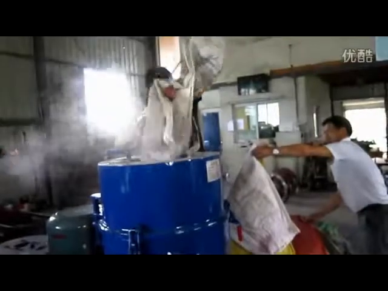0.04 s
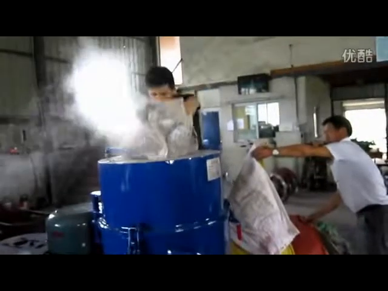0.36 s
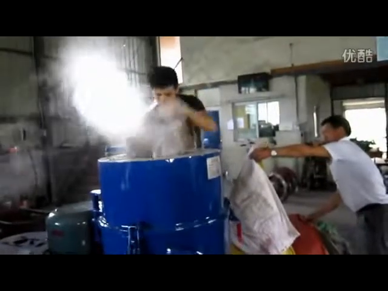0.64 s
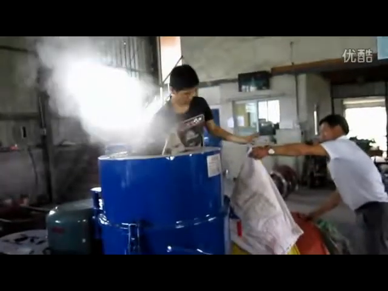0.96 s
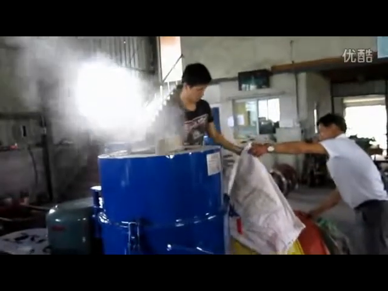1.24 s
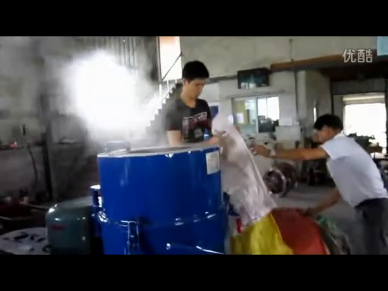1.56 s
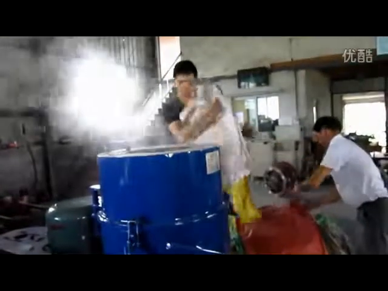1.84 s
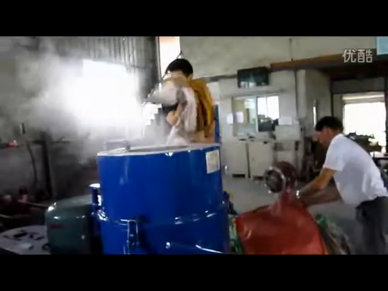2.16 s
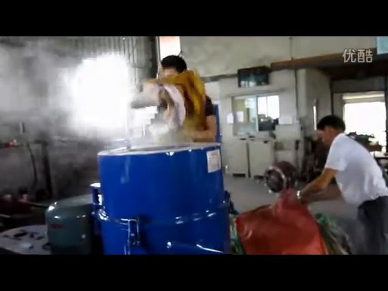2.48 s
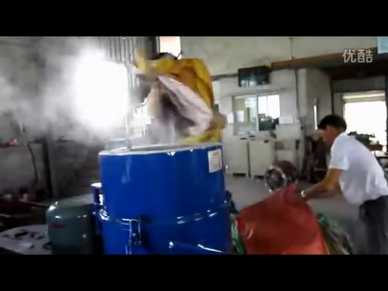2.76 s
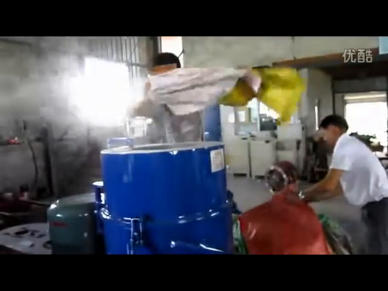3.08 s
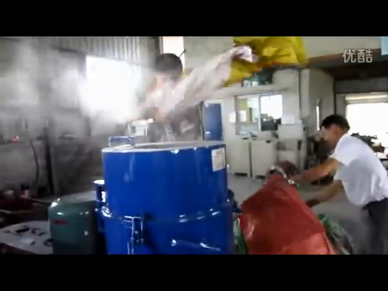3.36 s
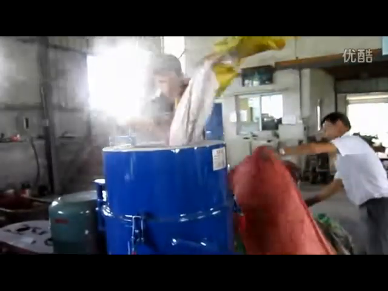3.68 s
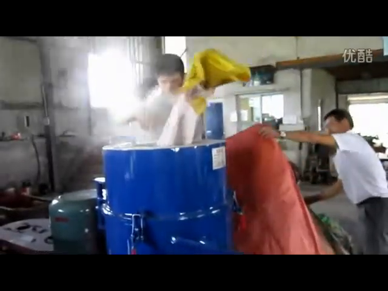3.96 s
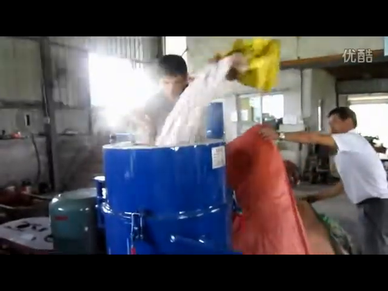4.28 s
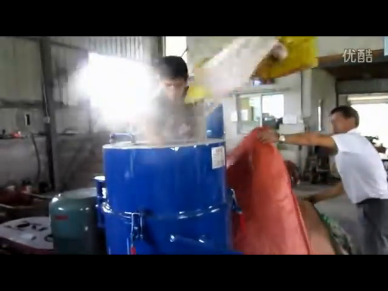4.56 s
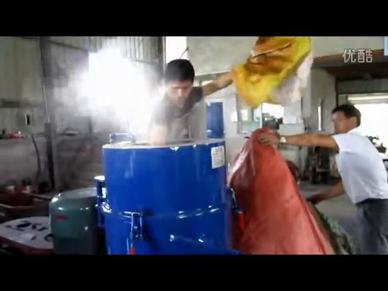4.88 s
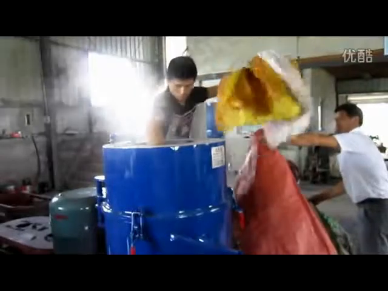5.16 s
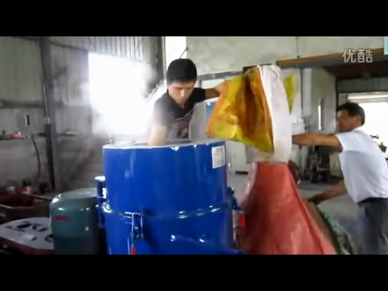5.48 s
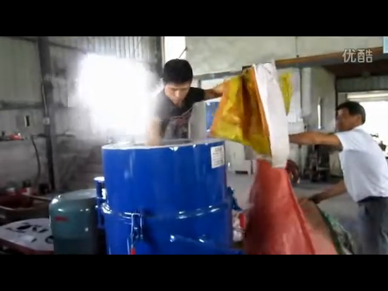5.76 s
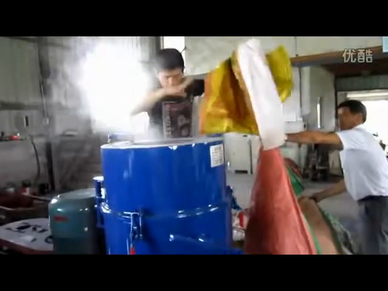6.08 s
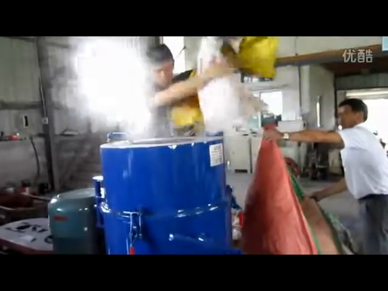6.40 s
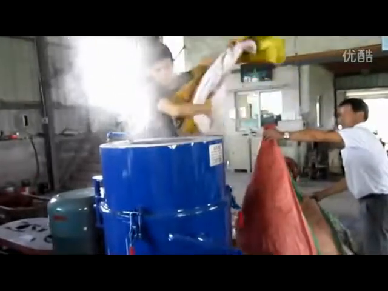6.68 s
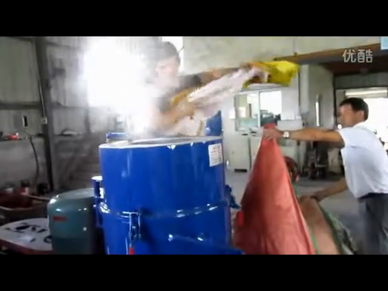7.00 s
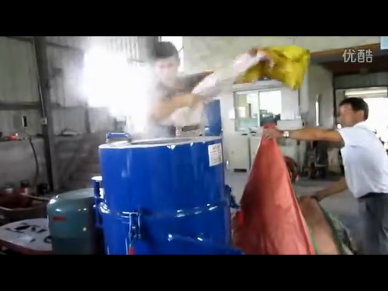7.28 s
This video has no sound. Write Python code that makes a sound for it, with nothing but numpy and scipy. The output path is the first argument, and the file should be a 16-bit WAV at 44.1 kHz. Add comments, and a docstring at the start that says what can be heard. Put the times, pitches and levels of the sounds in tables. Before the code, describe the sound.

Shredded plastic rushes and scrapes around a machine's drum in a workshop, over a droning motor, wavering blade howl and faint thin squeals.

```python
"""A hard-walled workshop, one microphone near a plastic recycling machine churning film in a steel drum.
Shreds tumble, rush, scrape and hiss; the rush surges when the blades catch a wad.
The blades howl in waves as the heap circles and slumps. Motor and rotor drone on many multiples
of the shaft speed, sagging a little under load. Behind it all, plastic squeals thinly on the steel."""
import sys
import numpy as np
from scipy import signal
from scipy.fft import rfft, irfft, next_fast_len
from scipy.io import wavfile
from scipy.ndimage import uniform_filter1d

SR = 44100
rng = np.random.default_rng(int(sys.argv[2]) if len(sys.argv) > 2 else 0)


def output_pcm(signal):
    """Save a mono or channel-first signal as 16-bit PCM at the path in sys.argv[1].

    Samples are clipped to [-1, 1] before scaling.
    """
    pcm = np.clip(np.atleast_2d(signal).T, -1, 1) * 32767
    wavfile.write(sys.argv[1], SR, np.round(pcm).astype(np.int16))


N = 328104
TIME = np.arange(N) / SR

# the heap's five noises as they reach the microphone, low to high: f/Hz, relative level/dB
TUMBLE_SPECTRUM = [(20, -35), (50, -20.5), (90, -20.5), (112, -8.5), (135, -15.5), (170, 0), (215, 0),
                   (250, 0), (268, -10.5), (310, 2), (400, -0.5), (520, -7.5), (1000, -32.5)]
THUD_SPECTRUM = [(200, -32.5), (380, -9.5), (470, -5.5), (525, 0), (565, -4.5), (640, -21.5), (800, -40.5)]
RUSH_SPECTRUM = [(450, -34.5), (600, -6), (680, -5), (725, -7), (890, -1.5), (1200, -2.5), (1400, -4.5),
                 (1540, -3.5), (1640, -12), (2500, -41.5)]
SCRAPE_SPECTRUM = [(900, -34.5), (1600, -3), (2050, 1), (2450, -2.5), (2850, -4.5), (3300, -11.5),
                   (4500, -24), (7000, -49)]
HISS_SPECTRUM = [(1800, -28.5), (3000, 1.5), (3600, 3.5), (4700, 1.5), (5350, 1), (5750, -2), (6000, -4.5),
                 (6300, -8), (6800, -11.5), (7300, -29.5)]
# the low tumbling of lumps: t/s, level/dB
TUMBLE_LEVEL = [(0, -35), (.25, -37), (.8, -34.5), (1.02, -32), (1.2, -34.5), (1.37, -36.5), (1.52, -30),
                (1.67, -34), (1.8, -30.5), (2.1, -31.5), (2.4, -35.5), (2.48, -35), (2.63, -28),
                (2.78, -33.5), (3.05, -33.5), (3.32, -38), (3.48, -32.5), (3.66, -38), (3.87, -36),
                (4.05, -32.5), (4.17, -35), (4.28, -35.5), (4.45, -34.5), (4.87, -36.5), (5.25, -31),
                (5.6, -32), (6.08, -34.5), (6.28, -32), (6.55, -33.5), (6.78, -39), (6.95, -34.5),
                (7.2, -37), (7.44, -37.5)]
# the heap slumps against the drum wall (+) or lifts off it (-): peak t/s, length/s, change/dB
HEAP_SLUMPS = [(.72, 0.24, -2), (1.3, 0.26, 2), (1.47, 0.22, 4.5), (2.15, 0.4, 1.5), (2.47, .14, -1.5),
               (1.8, 0.33, 1.5), (2.85, 0.26, 2.5), (3.48, .16, 3.5), (3.68, .22, -2.5), (3.95, .24, -3),
               (4.28, .12, -3.5), (4.42, .22, 3), (5.03, .35, 0), (5.9, .14, -2), (6.27, 0.38, 2.5),
               (6.58, .14, 0.5), (6.83, .2, -1.8), (7.2, 0.25, 2.4)]
# fine flakes shower down the drum wall (+) or thin out (-): peak t/s, length/s, change/dB
FLAKE_SHOWERS = [(.08, 0.29, 0.5), (1.78, .3, -1), (2.55, .22, 1), (2.86, 0.26, -0.5), (4.5, 0.53, 1),
                 (4.95, .25, -0.5), (5.83, 0.19, -0.5), (6.35, 0.25, 1.3), (6.88, .3, -1)]

def churn(turns, thud_db=-32, rush_db=-23, scrape_db=-30.5, hiss_db=-37, waver_db=0.5):
    """Up front, lumps tumble and thud, the mass rushes round, flakes scrape and hiss along the drum."""
    sag, rush_surge, scrape_surge = strain()
    tumble = curves(TUMBLE_LEVEL)[0]
    thud = thud_db + swells(HEAP_SLUMPS)
    rush = rush_db + rush_surge + waver_db * waver(30)
    # load turns hiss into scraping
    scrape = scrape_db + 8 * sag + scrape_surge + waver_db * waver(42)
    hiss = hiss_db - 6 * sag + swells(FLAKE_SHOWERS) + waver_db * waver(24)
    lumps = shreds(turns, per_s=4000, spread_db=0.3, throb=0.082)
    flakes = shreds(turns, per_s=5000, spread_db=2.5, throb=0.024)
    layers = [(tumble, rng.standard_normal(N), TUMBLE_SPECTRUM),
              (thud, rng.standard_normal(N), THUD_SPECTRUM),
              (rush, lumps, RUSH_SPECTRUM),
              (scrape, flakes, SCRAPE_SPECTRUM),
              (hiss, rng.standard_normal(N), HISS_SPECTRUM)]
    return sum(gain_of(db) * steadied(coloured(workshop(drive), spectrum))
               for db, drive, spectrum in layers)


def shreds(turns, per_s, spread_db, throb):
    """Dense impacts of uneven size over rushing air, bunched twice a turn by the blades."""
    hits = (rng.random(N) < per_s / SR) * rng.standard_normal(N)
    hits *= gain_of(spread_db * np.minimum(rng.exponential(1, N), 4))
    air = rng.standard_normal(N)
    return (evened(hits) + air) * (1 + throb * np.cos(4 * np.pi * turns))


# the shaft, slowed by its load: t/s, speed/(turns per s)
SHAFT_SPEED = [(0, 25.82), (0.5, 25.764), (1, 25.752), (1.35, 25.76), (1.7, 25.684), (2, 25.692),
               (2.3, 25.776), (2.7, 25.752), (3.2, 25.804), (3.8, 25.832), (4.3, 25.82), (5, 25.84),
               (5.9, 25.856), (6.25, 25.752), (6.55, 25.76), (6.9, 25.816), (7.44, 25.812)]
# the blades catch a wad of film: peak t/s, length/s, rush change/dB, scrape change/dB
WAD_CATCHES = [(.36, 0.22, 1.3, 0), (1.06, .14, -3, 2.5), (1.32, .2, 0.5, -0.3), (1.93, 0.091, 2.5, 2),
               (2.2, 0.44, 0, 1.2), (2.39, .18, 0.5, 0.5), (2.65, 0.24, 1, 2.5), (2.97, .28, 0, 0),
               (3.3, 0.13, 2.5, 2), (3.97, 0.14, 0, 1), (4.14, 0.24, 0, 1), (4.42, .14, -1, 1.5),
               (4.88, 0.21, -0.5, 2), (5.31, 0.12, 2, 0), (5.54, .16, 1.5, 2), (5.7, .22, 1.3, 0),
               (5.92, 0.22, 1, 0), (6.15, 0.22, 1, 0.5), (6.29, 0.14, 2.1, 0.5), (6.35, .14, -1, 1.5),
               (6.45, 0.11, 1, 2), (6.53, 0.33, -0.8, 1.5), (6.73, .14, 0.8, .5), (6.95, .13, 2.3, 1),
               (7.15, 0.15, 1.5, 2.5)]
# further swells and dips of rush and scrape, played like the wad catches: peak t/s, length/s, rush change/dB,
# scrape change/dB
MORE_SWELLS = [(.25, .4, 0, -2), (.69, 0.27, -1.5, 0), (.9, 0.32, 1, -1.5), (1.1, 0.3, 1, -1.5),
               (1.17, .12, -1.5, -0.5), (1.5, 0.13, -2.3, 1.5), (2.75, 0.18, -2.5, -2.5),
               (3.6, 0.12, -1, 1), (4.72, .18, -1, -0.5), (5.02, .14, -0.5, 0.5), (5.75, .16, -1.5, 0),
               (6.84, .13, -4, -1)]

def strain(free_turns_per_s=25.86):
    """How hard the drum works: the shaft's sag (turns per s) and the swells of rush and scrape (dB)."""
    sag = free_turns_per_s - curves(SHAFT_SPEED)[0]
    peaks, lengths, *changes = np.transpose([*WAD_CATCHES, *MORE_SWELLS])
    rush, scrape = (swells(zip(peaks, lengths, db)) for db in changes)
    return sag, rush, scrape


HUM_ORDER, WHINE_ORDER, HOWL_ORDER, UPPER_ORDER, TOP_ORDER = 6, 26, 30, 36, 39  # cycles per turn
# the lowest whine: t/s, level/dB
WHINE_LEVEL = [(0, -35), (.3, -31.5), (.43, -48), (.6, -38), (.97, -31), (1.13, -46), (1.26, -31.5),
               (1.5, -37), (1.62, -32), (2.03, -41), (2.2, -33), (2.6, -34), (2.73, -35.5), (2.86, -31.5),
               (4.45, -31), (5, -32.5), (5.17, -27.5), (5.35, -33), (6.6, -32.5), (6.76, -36), (7, -38),
               (7.44, -37)]
# waves of howling as the heap circles past: peak t/s, length/s, change/dB
HOWL_WAVES = [(.28, .25, -2), (.74, .25, 5), (.97, 0.37, 5), (1.36, 0.26, 6.5), (1.64, 0.45, 2),
              (1.97, 0.32, 4), (2.39, 0.3, 6), (2.68, .3, 1), (2.92, .3, 3), (3.15, 0.25, 5.5),
              (3.56, 0.21, 9.5), (3.82, 0.47, 5.5), (4.12, .4, 2.5), (4.55, 0.57, 5.5), (4.82, .25, 3.5),
              (5.05, .25, -1), (5.33, 0.17, 8.5), (5.56, 0.18, 8), (5.81, 0.19, 6), (6.04, .2, 2.5),
              (6.24, 0.4, 8), (6.43, 0.27, 7.5), (6.75, 0.21, 6.5), (6.98, .28, 7), (7.2, 0.3, 8),
              (7.36, 0.34, 5)]
# the upper whines, smothered by fresh film and rising as the blades clear: t/s, change/dB
BLADE_CLEARANCE = [(0, -4.5), (.6, -8), (1.35, 0.5), (1.9, -4), (2.25, 0.5), (3.2, 0.5), (4.05, 3),
                   (4.9, -0.5), (6.3, 0), (6.75, -0.5), (7.2, -3), (7.44, 1)]

def blades(turns, hum_db=-42.5, howl_db=-32, upper_db=-32.5, top_db=-37, waver_db=0.5):
    """The rotor's main tones: load lifts the hum, the howl comes in waves, clear blades whine more."""
    sag, surge, _ = strain()
    clearance = curves(BLADE_CLEARANCE)[0]
    hum = hum_db + 30 * sag + 0.3 * waver(10)
    whine = curves(WHINE_LEVEL)[0] + waver_db * waver(15)
    howl = howl_db + swells(HOWL_WAVES) + waver_db * waver(17)
    upper = upper_db + clearance + .5 * surge + waver_db * waver(5.7)
    return (gain_of(hum) * tone(HUM_ORDER * turns)
            + gain_of(whine) * tone(WHINE_ORDER * turns)
            + gain_of(howl) * blade_tone(HOWL_ORDER * turns, wake_db=-8, wake_ratio=.997, width_hz=35)
            + gain_of(upper) * blade_tone(UPPER_ORDER * turns, wake_db=-5, wake_ratio=.995, width_hz=22)
            + gain_of(top_db + clearance) * tone(TOP_ORDER * turns))


def blade_tone(cycles, wake_db, wake_ratio, width_hz):
    """A tone of the blades, blurred just below its pitch by the plastic that trails them."""
    return tone(cycles) + gain_of(wake_db) * steadied(fuzzy(wake_ratio * cycles, width_hz))


# weaker lines of motor and rotor: multiple of the shaft speed, level/dB
DRONE_LINES = [(10,-51), (12,-41), (13,-49), (14,-39), (17,-40), (18,-37), (19,-38), (20,-40), (21,-37),
               (22,-53.5), (23,-41.5), (24,-49), (25,-38), (27,-39.5), (31,-47.5), (32,-53), (33,-48),
               (34,-42.5), (35,-42), (38,-40.5), (40,-43.5), (41,-39.5), (43,-43), (44,-44.5), (45,-41),
               (46,-46), (47,-49.5), (48,-45.5), (49,-42.5), (51,-40), (58,-55), (60,-47)]

def drone(turns, unsteady=0.19, lift_db=0.5):
    """Under the blades, low lines swell with slumps, high ones with surges and as the blades clear."""
    low, high = np.zeros((2, N))
    for order, db in DRONE_LINES:
        # the shifting load shakes the high lines most
        shaken = np.clip(unsteady * np.sqrt(order / HOWL_ORDER), 0, 1)
        line = np.sqrt(1 - shaken) * tone(order * turns)
        line += np.sqrt(shaken) * fuzzy(order * turns, width_hz=5)
        add(low if order < WHINE_ORDER else high, 0, gain_of(db + lift_db) * line)
    _, surge, _ = strain()
    clearance = curves(BLADE_CLEARANCE)[0]
    return low * gain_of(swells(HEAP_SLUMPS)) + high * gain_of(surge + 0.22 * clearance)


# thin, steady modes of the drum: f/Hz, width/Hz, level/dB
DRUM_MODES = [(111, 3, -58), (240, 14, -46), (1314, 14, -41), (2247, 16, -48), (2485, 25, -52)]

def ringing():
    """Rubbing plastic keeps the steel ringing faintly behind the drone."""
    return sum(gain_of(db) * fuzzy(hz * TIME, width) for hz, width, db in DRUM_MODES)


# plastic squealing on the hot steel: t/s, length/s, f/Hz, level/dB, pitch wander/Hz
STEEL_SQUEALS = [(0, .48, 5022, -49, 9), (.04, .41, 3929, -53, 5), (.1, .62, 4885, -51.5, 8),
                 (.45, .48, 5010, -51, 14), (.5, .3, 5255, -53, 10), (.78, .4, 5150, -47.5, 110),
                 (1.15, .45, 5071, -53, 14), (1.55, .9, 5340, -53, 70), (2.4, .75, 5260, -51.5, 40),
                 (2.45, 1.1, 5173, -51, 20), (2.55, .47, 4236, -53.5, 5), (2.55, .45, 5025, -50, 11),
                 (2.62, .5, 5478, -54, 8), (3.05, 1.15, 5328, -51.5, 13), (3.05, 1.1, 5432, -52.5, 20),
                 (3.12, .5, 5078, -50, 12), (3.3, 1.15, 5178, -51, 20), (3.8, .3, 5081, -48.5, 10),
                 (4.1, .4, 5045, -50.5, 20), (4.28, .42, 5188, -48, 20), (4.3, 1.1, 4953, -55.5, 10),
                 (4.68, .75, 5622, -54.5, 7), (4.68, .3, 5388, -48.5, 6), (4.64, .2, 5170, -48, 10),
                 (4.82, .21, 5173, -43, 11), (4.78, .4, 3509, -50, 7), (4.98, .36, 5185, -49.5, 24),
                 (5.28, .22, 5193, -47, 14), (6.08, .36, 5054, -51, 10), (6.1, .4, 4930, -53, 12),
                 (6.6, .35, 5001, -47.5, 4), (6.64, .28, 5125, -49.5, 12), (6.68, .28, 5350, -52, 10),
                 (7.03, .45, 5185, -50, 18)]
# weaker tones beside each of these squeals: offset f/Hz, relative level/dB
SIDE_TONES = [(-135, -11), (215, -13)]

def squealing():
    """In the background, shreds rub on the steel: clearer squeals over a scatter of faint ones."""
    out = np.zeros(N)
    for start, length, hz, db, wander_hz in STEEL_SQUEALS:
        for offset_hz, side_db in [(0, 0), *SIDE_TONES]:
            add(out, start, squeal(length, hz + offset_hz, db + side_db, wander_hz))
    # faint squeals fall between these bounds, in the columns of STEEL_SQUEALS
    scattered = rng.uniform((0, .2, 3200, -57, 1), (TIME[-1], .5, 4650, -52, 5), (60, 5))
    clustered = rng.uniform((0, .12, 4950, -58, 3), (TIME[-1], .35, 5480, -53, 14), (36, 5))
    for start, *shape in [*scattered, *clustered]:
        add(out, start, squeal(*shape))
    return out


def squeal(length, hz, db, wander_hz, slips_per_s=45, flutter_db=2, loose_hz=30):
    """A shred sticks and slips: one tone when it grips firmly, three close ones when it wanders."""
    t = TIME[:max(round(length * SR), 64)]
    looseness = min(wander_hz / loose_hz, 1)
    out = np.zeros(len(t))
    for k in range(3):
        slip, grip = (np.interp(t * slips_per_s, np.arange(128), steps)
                      for steps in rng.standard_normal((2, 128)))
        cycles = np.cumsum(hz + wander_hz * slip) / SR
        out += looseness ** k * gain_of(flutter_db * grip) * tone(cycles)
    return gain_of(db) * evened(out * signal.windows.tukey(len(t), alpha=.4))


def workshop(x, t60_s=0.42, wet_db=-9, echoes_per_s=2000):
    """Near the drum the direct sound leads; the hard walls scatter it back, with total power kept."""
    t = TIME[:SR // 2]
    echoes = rng.standard_normal(len(t)) * (rng.random(len(t)) < echoes_per_s / SR)
    echoes *= gain_of(-60 * t / t60_s)
    wet = signal.fftconvolve(x, echoes / np.linalg.norm(echoes))[:N]
    return (x + gain_of(wet_db) * wet) / np.hypot(1, gain_of(wet_db))


def gain_of(db):
    """Decibels to amplitude."""
    return 10 ** (np.asarray(db) / 20)


def evened(x):
    """Scales to rms 1."""
    return x / np.sqrt(np.mean(abs(x) ** 2) + 1e-20)


def steadied(x, window_s=0.12, evenness=.7):
    """Evens out the slow chance swells of a noise, at rms 1."""
    size = round(window_s * SR)
    power = uniform_filter1d(uniform_filter1d(x ** 2, size), size)
    return evened(x / power ** (evenness / 2))


def curves(rows):
    """Each column of a time table, at every sample."""
    times, *columns = np.transpose(rows)
    return [np.interp(TIME, times, column) for column in columns]


def swells(rows):
    """Smooth rises and falls in dB, from rows of peak t/s, length/s, change/dB."""
    return sum(db * np.cos(np.pi * np.clip((TIME - peak) / length, -.5, .5)) ** 2
               for peak, length, db in rows)


def coloured(x, spectrum):
    """Gives x a spectrum drawn on a log-frequency axis, at rms 1."""
    hz, db = np.transpose(spectrum)
    size = next_fast_len(N)
    f = np.fft.rfftfreq(size, 1 / SR)
    shape = gain_of(np.interp(np.log(f + 1), np.log(hz), db))
    shape /= 1 + (f / hz[-1] / 2) ** 2  # rolls off above the last point
    return evened(irfft(rfft(x, size) * shape, size)[:N])


def drift(width_hz, rate_hz=500):
    """Slow complex noise of rms 1, in a narrow band round zero."""
    f = np.fft.fftfreq(4096, 1 / rate_hz)
    phases = np.exp(2j * np.pi * rng.random(len(f)))
    noise = np.fft.ifft(phases / (1 + (2 * f / width_hz) ** 2))
    return evened(np.interp(TIME, np.arange(len(f)) / rate_hz, noise))


def waver(width_hz):
    """Slow real noise of rms 1."""
    return evened(drift(width_hz).real)


def tone(cycles):
    """A clean tone of rms 1 and any starting phase."""
    return np.sqrt(2) * np.cos(2 * np.pi * (cycles + rng.random()))


def fuzzy(cycles, width_hz):
    """A tone whose strength and phase wander, at rms 1."""
    return np.sqrt(2) * (drift(width_hz) * np.exp(2j * np.pi * cycles)).real


def add(mix, start, sound):
    """Mixes a sound in at its start time."""
    part = mix[max(round(start * SR), 0):][:len(sound)]
    part += sound[:len(part)]


def scene():
    """One shaft drives drone, blades and churning; they join the steel's sounds at one microphone."""
    turns = np.cumsum(curves(SHAFT_SPEED)[0]) / SR
    return (drone(turns) + blades(turns) + churn(turns) + ringing() + squealing())[None]


def record(dry, ceiling=.4, edge_hz=7100):
    """Behind the microphone, the recorder rounds off the highest peaks, then cuts the top treble."""
    rounded = dry / (1 + (dry / ceiling) ** 6) ** (1 / 6)
    lowpass = signal.firwin(601, edge_hz, window=("kaiser", 9), fs=SR)
    return signal.oaconvolve(rounded, lowpass[None], "same")


dry = scene()
out = record(dry)
output_pcm(out)
```